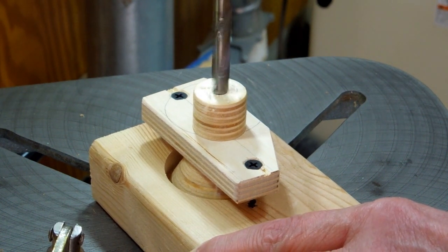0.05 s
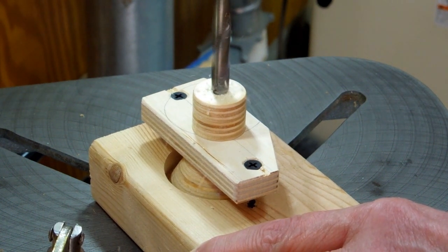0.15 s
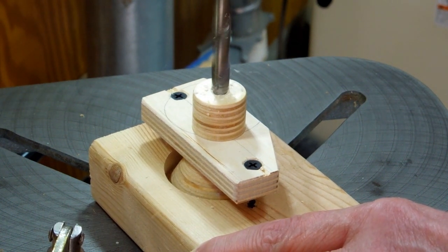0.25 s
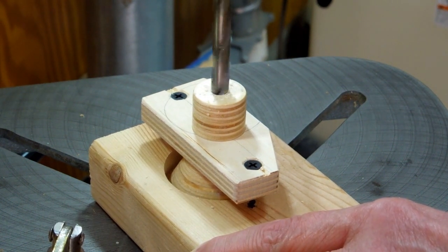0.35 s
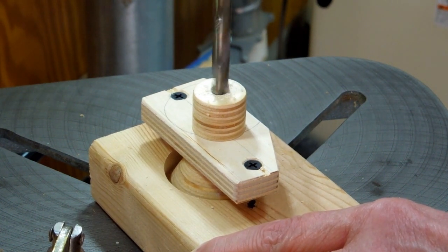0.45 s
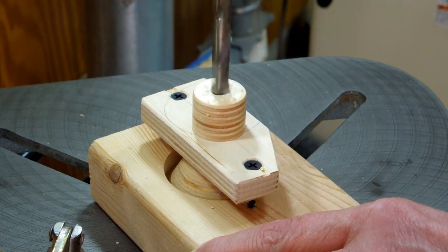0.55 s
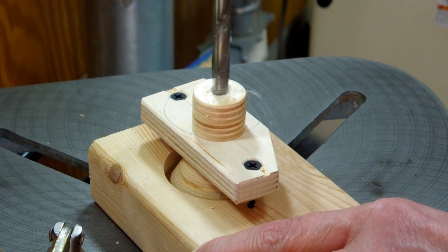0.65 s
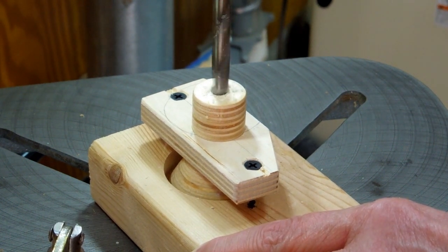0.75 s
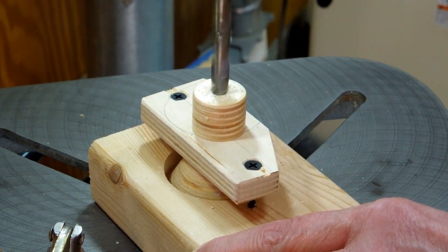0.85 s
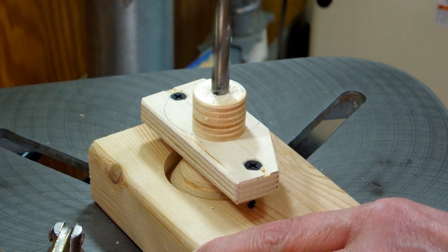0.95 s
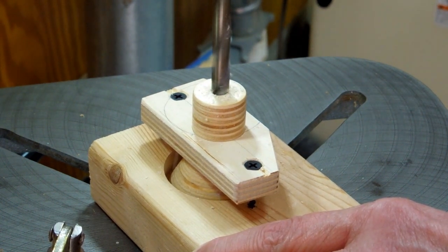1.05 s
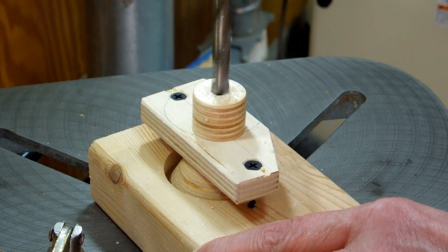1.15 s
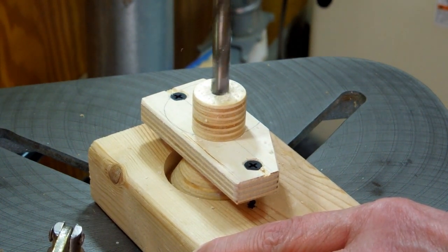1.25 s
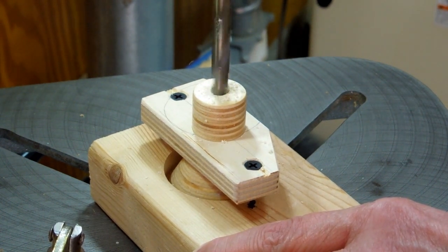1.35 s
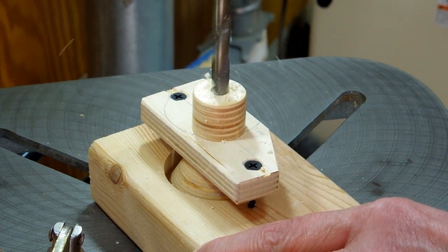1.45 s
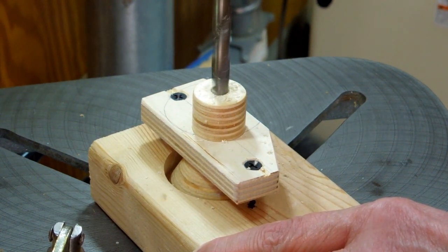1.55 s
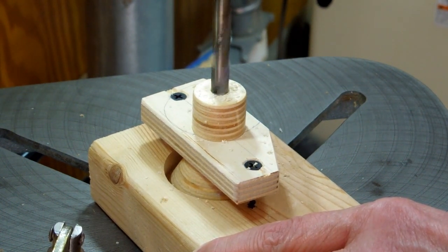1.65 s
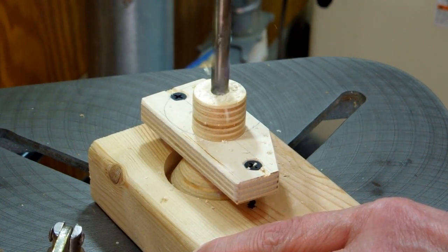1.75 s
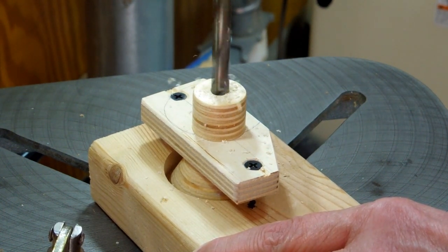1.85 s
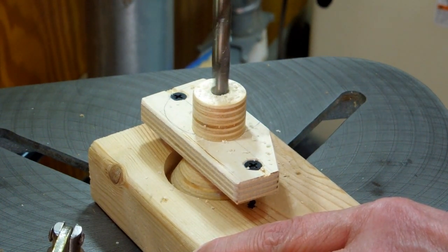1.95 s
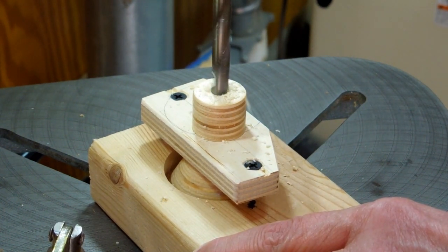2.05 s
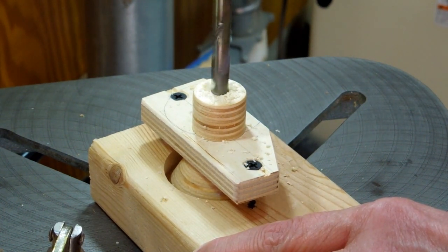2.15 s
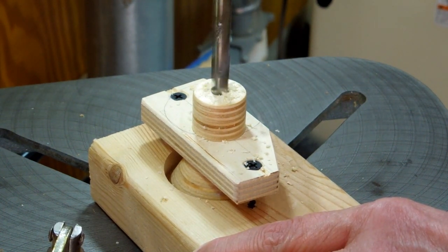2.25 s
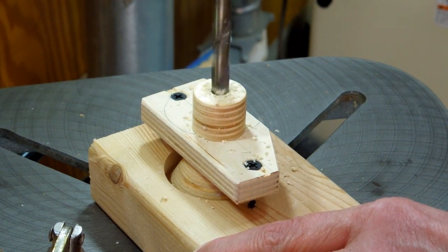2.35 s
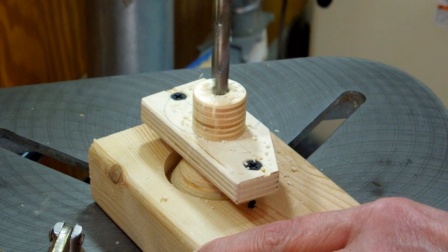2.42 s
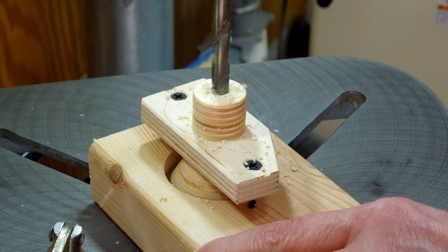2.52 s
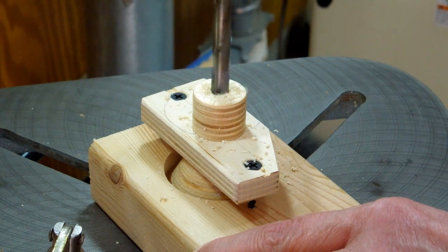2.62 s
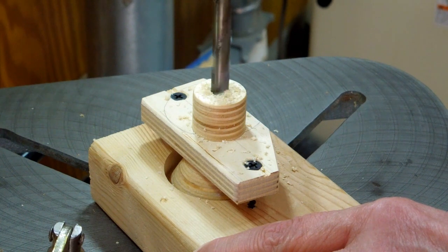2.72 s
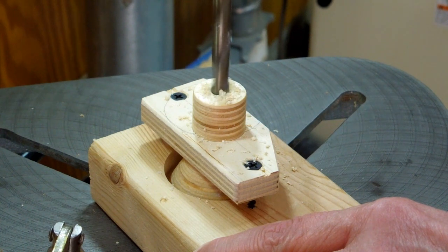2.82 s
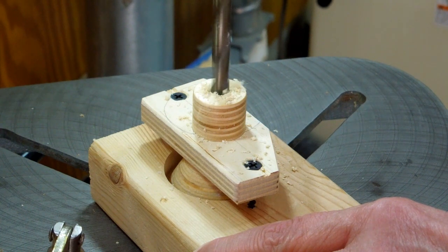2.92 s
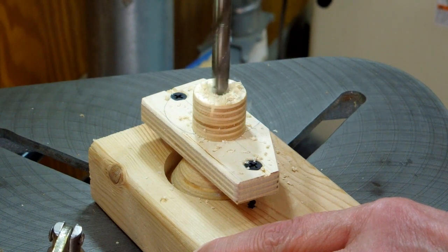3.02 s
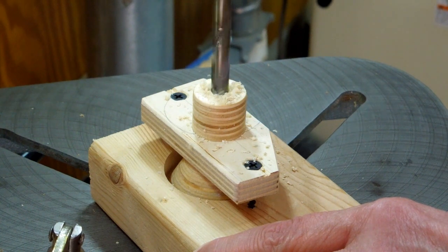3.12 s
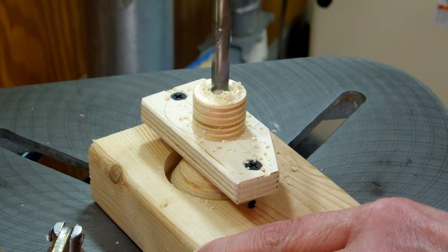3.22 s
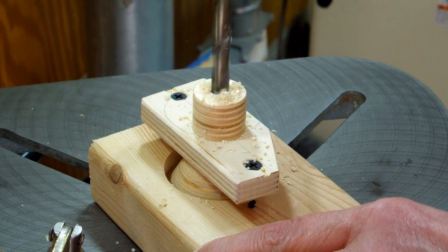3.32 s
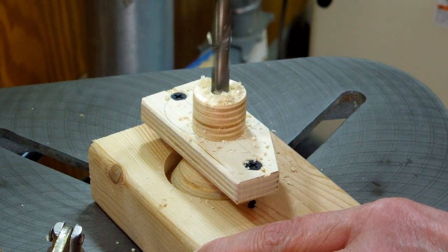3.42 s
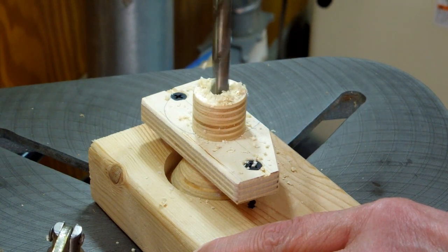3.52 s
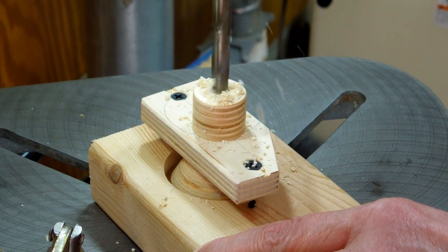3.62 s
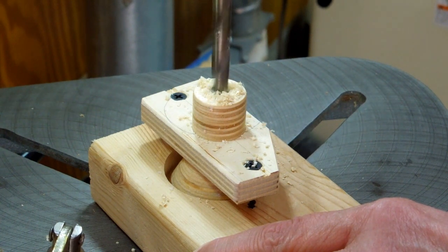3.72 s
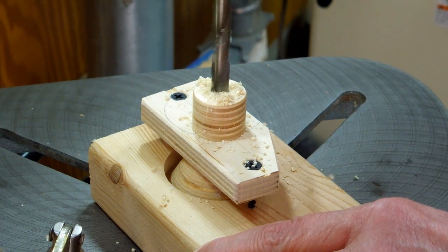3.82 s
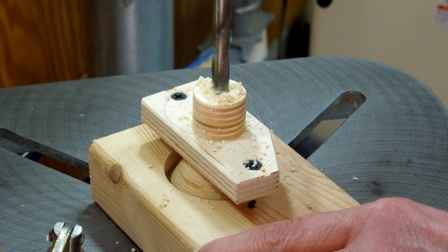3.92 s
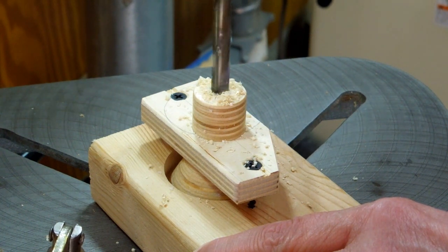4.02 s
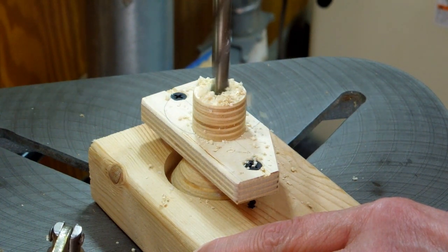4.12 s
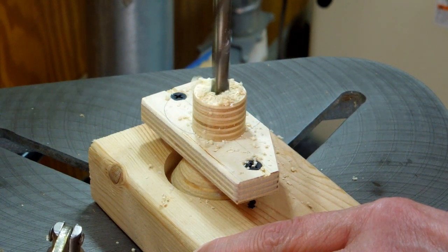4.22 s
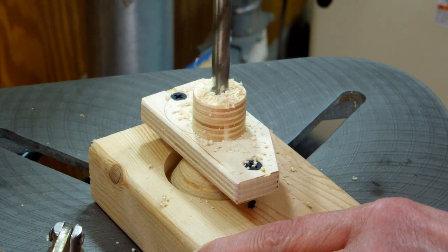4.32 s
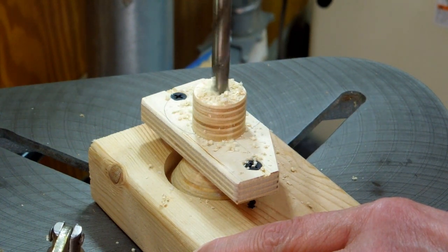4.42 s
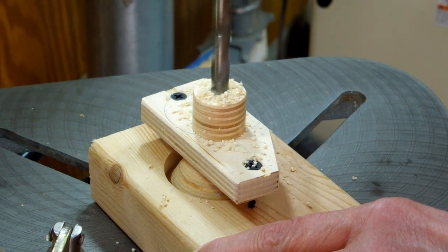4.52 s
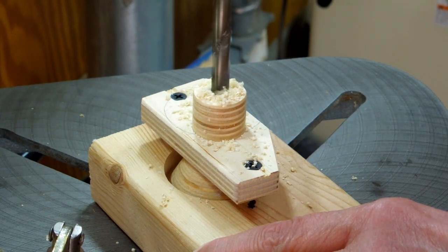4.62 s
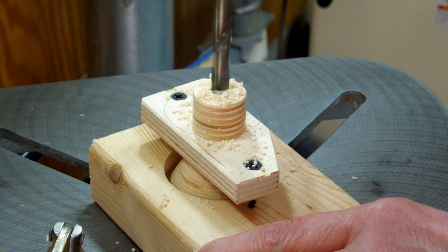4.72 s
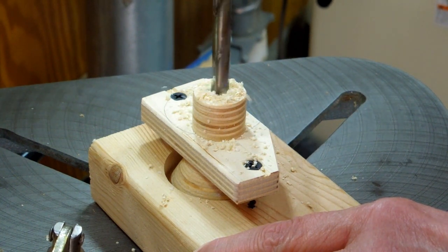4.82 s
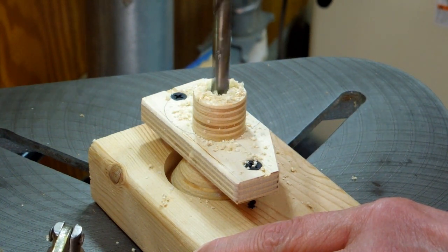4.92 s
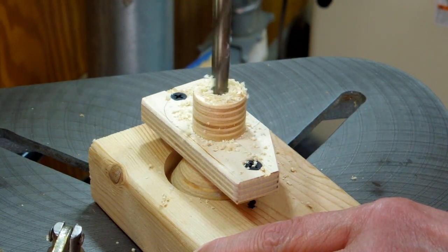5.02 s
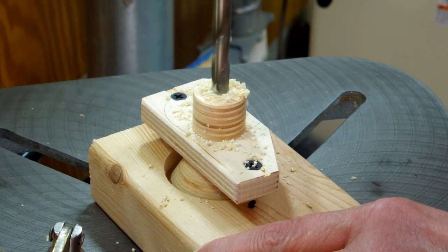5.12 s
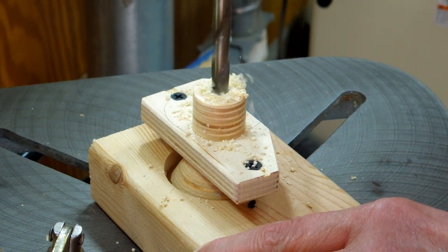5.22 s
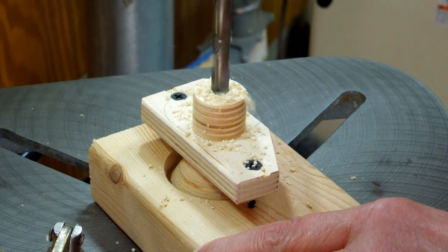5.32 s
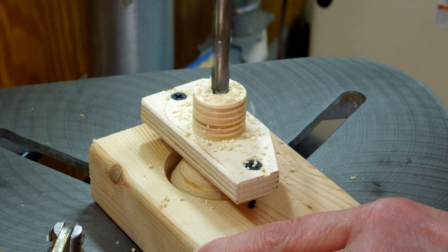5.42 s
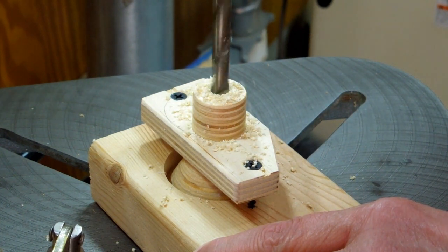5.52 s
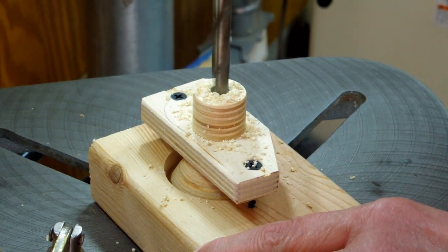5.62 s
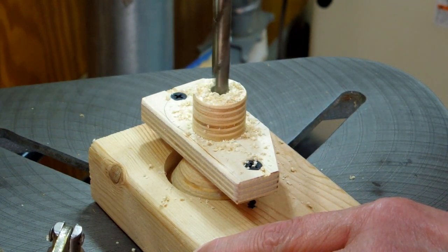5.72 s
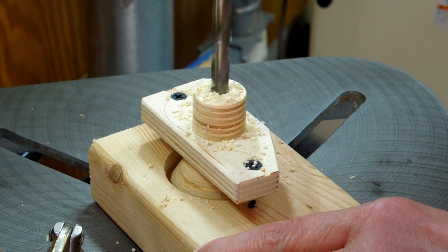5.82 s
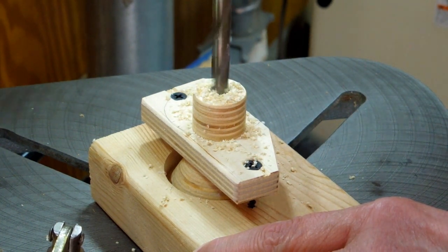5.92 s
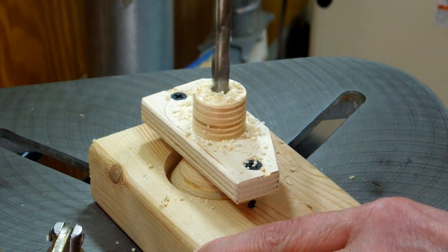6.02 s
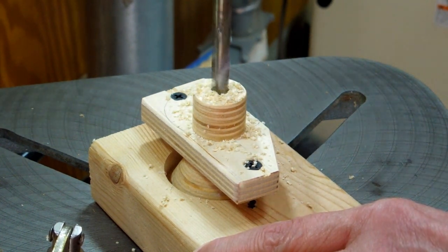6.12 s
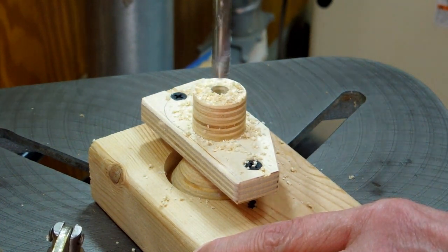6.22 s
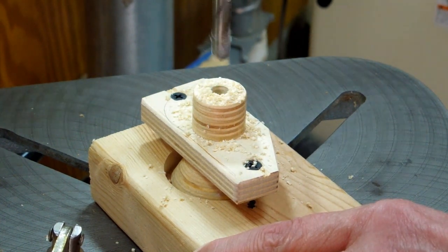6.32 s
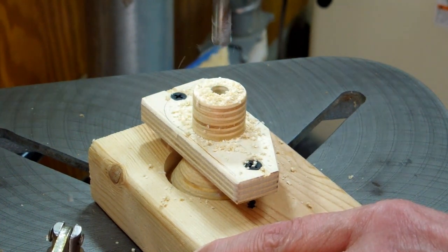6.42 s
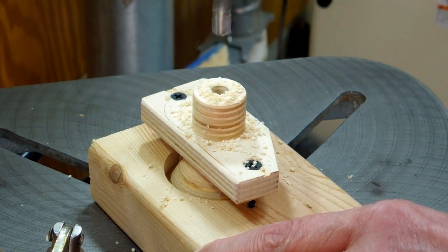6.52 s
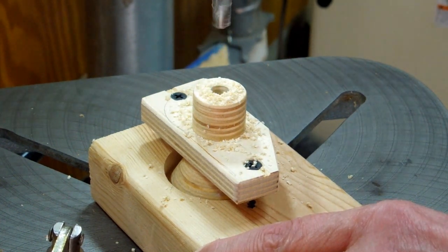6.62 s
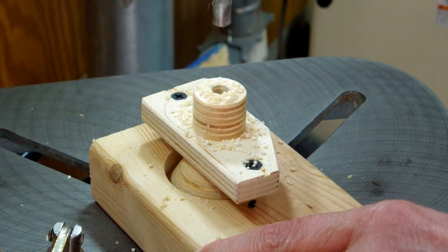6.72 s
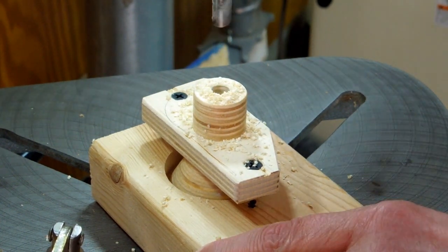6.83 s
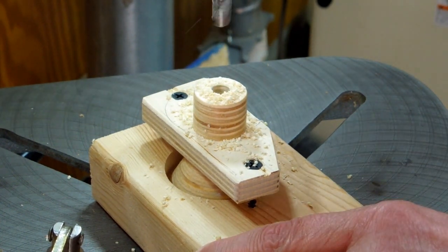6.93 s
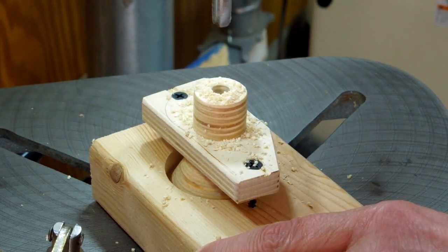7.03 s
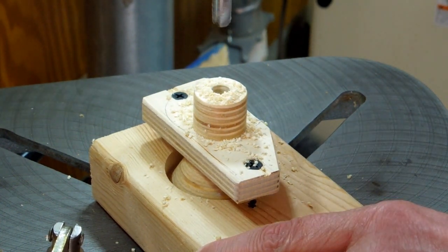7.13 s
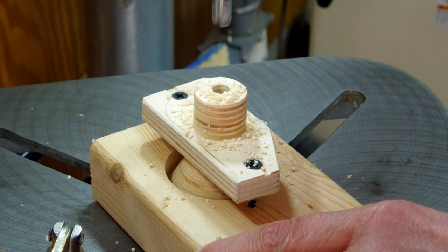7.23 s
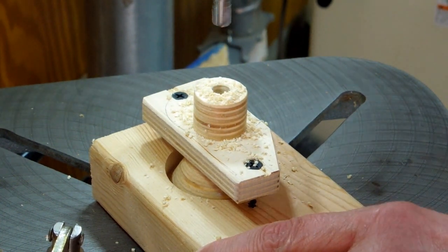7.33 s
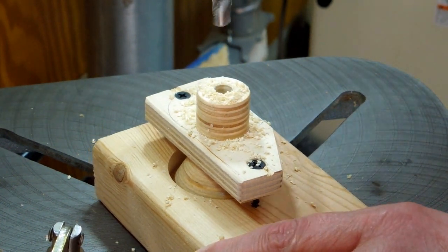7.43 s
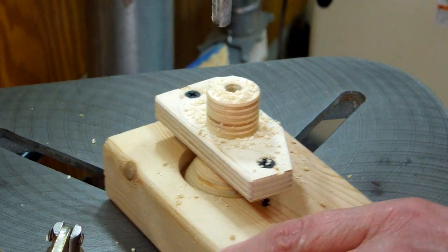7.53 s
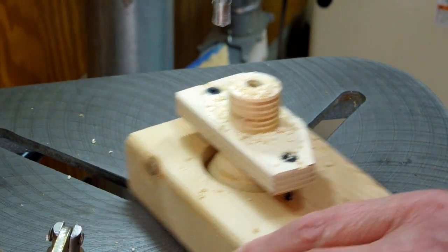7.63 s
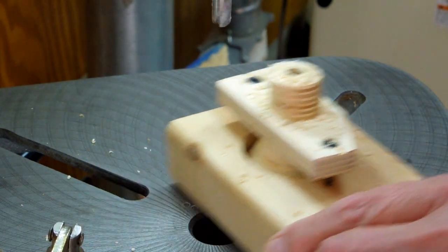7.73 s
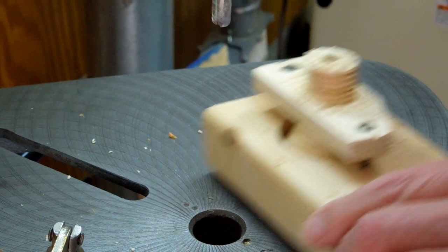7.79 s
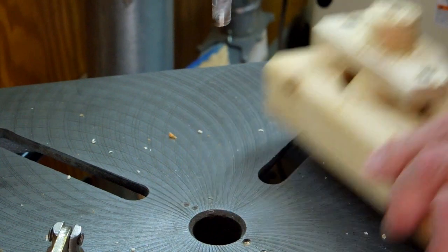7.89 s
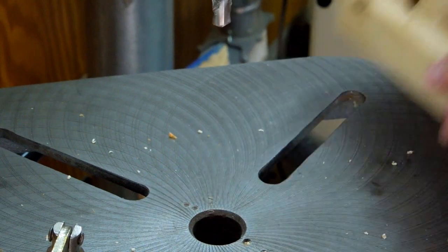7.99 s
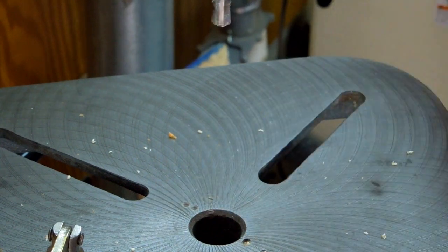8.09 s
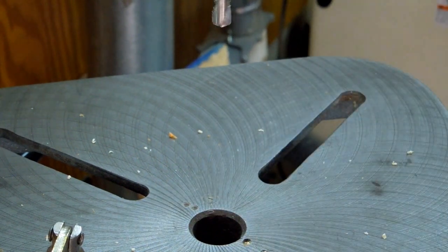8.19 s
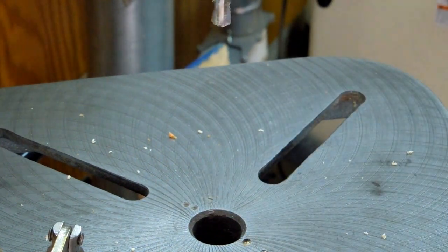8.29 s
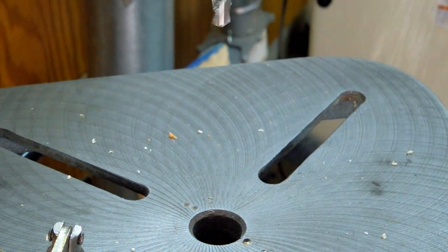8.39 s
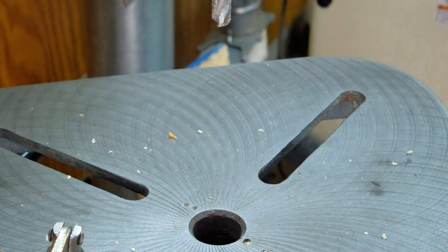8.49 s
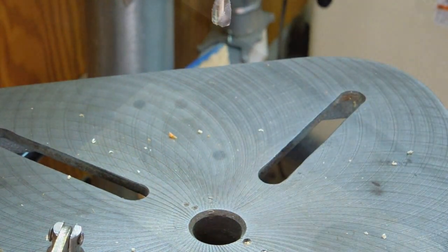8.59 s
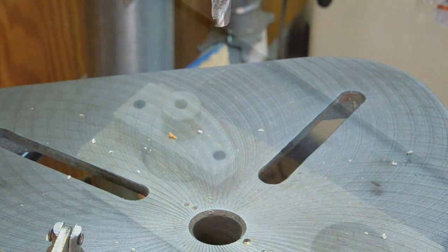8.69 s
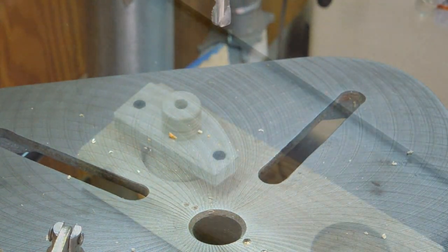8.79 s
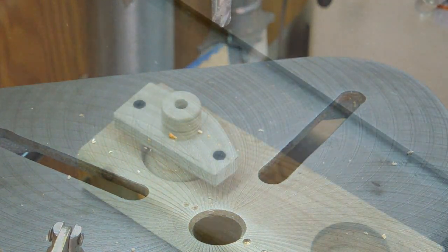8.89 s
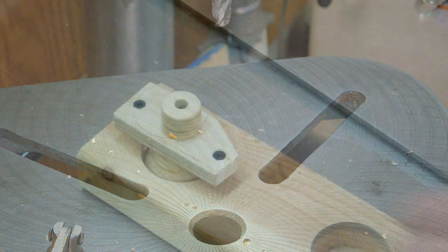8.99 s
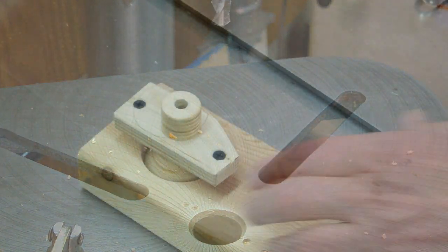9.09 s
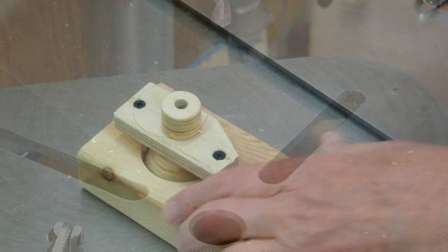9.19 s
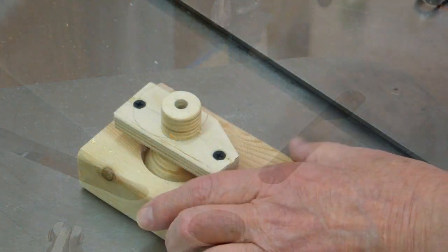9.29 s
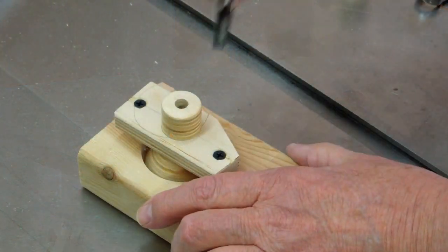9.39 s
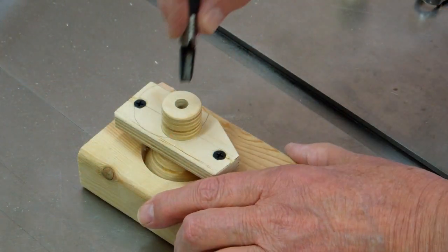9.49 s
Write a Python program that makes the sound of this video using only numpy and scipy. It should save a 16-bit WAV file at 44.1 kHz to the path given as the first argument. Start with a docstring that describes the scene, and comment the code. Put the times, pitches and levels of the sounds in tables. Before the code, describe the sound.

A drill bit rasps and throbs through wood on a humming drill press, lifts out, then a loud switch click and a whirring spin-down.

```python
"""In a workshop, a drill press bores into a wooden jig on its iron table, close to a two-port microphone.
Chips torn by the bit's two edges are throbbing noise that rings resonances of bit and jig; bearings and belt are
coloured noise, the motor two wavering sines. The switch clicks off, the spindle coasts, a starting switch clacks;
a faint soft rustle of the next scene comes in as the workshop fades out. Until 7.2 s each channel is spliced from
short pieces shifted in time."""
import sys
import numpy as np
from scipy import signal
from scipy.fft import rfft, irfft, next_fast_len
from scipy.io import wavfile
from scipy.ndimage import uniform_filter1d

SR = 44100
rng = np.random.default_rng(int(sys.argv[2]) if len(sys.argv) > 2 else 0)


def generate_wav(signal):
    """Clip the signal to [-1, 1] and save it as 16-bit WAV at the path in sys.argv[1]."""
    frames = np.transpose(np.atleast_2d(signal))
    scaled = np.clip(frames, -1, 1) * 32767
    pcm = np.round(scaled).astype(np.int16)
    wavfile.write(sys.argv[1], SR, pcm)


N = 421155
T = np.arange(N) / SR
SIZE = next_fast_len(N + SR // 8)
HZ = np.fft.rfftfreq(SIZE, 1 / SR)

# Motor and table levels. Each row: time in seconds, hum, its octave and table thrum in dB.
HUM = [(0, -36, -37, -28.5), (.8, -31.5, -33.5, -30), (1.5, -32, -32, -33.5), (3.2, -32.5, -30, -32),
       (3.9, -33, -35.5, -35.5), (4.75, -32.5, -28.5, -34.5), (5.8, -34, -36.5, -33),
       (6.25, -31, -28, -37.5), (6.45, -31, -36, -38), (7.22, -29, -39, -29.5), (7.32, -50, -43, -36.5),
       (7.5, -60, -66, -44.5), (8.0, -46, -58, -50), (8.7, -62, -58, -45.5), (9.0, -74, -76, -58),
       (9.3, -67, -78, -71)]
# Resonances of the wooden jig, high and low. Each row: frequency in Hz, width in Hz, relative level in dB.
JIG = [(1066, 110, -4), (1275, 370, -10.5), (942, 52, -10), (1170, 113, -16.5)]
JIG_LOW = [(306.5, 82, -1.5), (433, 77, -6), (643, 24, -8.5), (740, 70, -5.5), (827, 97, -2)]
# Switch events. Each: start in seconds, energy of the first 16 ms in dB, burst length in seconds.
OFF_SWITCH = (7.2638, 21.5, .005)
STARTER = (8.526, 15.5, .0047)
# Stretches where both channels are cut alike (lag 0) or far apart.
# Each row: start in seconds, end in seconds, lag in ms either way (before scatter).
SLIPS = [(0, .06, 0), (.22, .46, 4), (.64, .72, 0), (.83, .94, 0), (1.16, 1.25, 0), (1.5, 1.7, 3.2),
         (1.78, 2.03, 3.2), (2.18, 2.21, 0), (2.41, 2.45, 0), (2.8, 2.88, 3.5), (3.0, 3.18, 3),
         (3.38, 3.47, 0), (3.86, 4.25, 3.8), (4.35, 4.41, 0), (4.59, 4.66, 0), (4.72, 4.86, 3.2),
         (5.04, 5.1, 0), (5.29, 5.35, 0), (5.46, 5.6, 3.8), (5.72, 6.25, 3.9), (7.12, 7.215, 3)]
JOIN_S, SPLICED_UNTIL_S = .014, 7.215  # longest cross-fade; end of the shifted pieces


def amp(db):
    """Level law: 20 dB is a factor of ten in amplitude."""
    return 10 ** (np.asarray(db) / 20)


def evened(x):
    """Normalisation to unit root-mean-square amplitude."""
    return x / np.sqrt(np.mean(x ** 2) + 1e-20)


def curves(rows):
    """Linear interpolation in time of every column of a table."""
    s, *columns = np.transpose(rows)
    return [np.interp(T, s, c) for c in columns]


def read(points, hz=HZ):
    """Interpolation of a spectrum table along a logarithmic frequency axis."""
    f, value = np.transpose(points)
    return np.interp(np.log(hz + 1), np.log(f + 1), value)


def rings(modes):
    """Modal superposition: the summed response of damped resonances (Hz, width Hz, dB)."""
    return sum(amp(db) / (1 + 2j * (HZ - f) / width) for f, width, db in modes)


def shape(x, response):
    """Linear filtering: a product of spectra."""
    return irfft(rfft(x, SIZE) * response, SIZE)[..., :N]


def highs(hz):
    """High-pass response with a steep roll-off below hz."""
    return 1 / (1 + (hz / (HZ + 1)) ** 4)


def wander(hz):
    """Low-passed chance of unit rms, moving mostly slower than hz."""
    steps = np.arange(0, N + 200, 100)
    decay = np.exp(-2 * np.pi * hz * 100 / SR)
    slow = signal.lfilter([1], [1, -decay], rng.standard_normal(len(steps)))
    return evened(np.interp(np.arange(N), steps, uniform_filter1d(slow, size=5)))


def grit(per_s, spread_db):
    """Shot noise: randomly timed clicks of uneven size, shared by two noise draws."""
    size = amp(spread_db * np.minimum(rng.exponential(1, N), 5))
    clicks = size * (rng.random(N) < per_s / SR)
    return evened(uniform_filter1d(clicks, size=12) * rng.standard_normal((2, N)))


def lumpy(tear, modes, strikes, lump_db):
    """Uneven modal excitation: each strike drives each mode (Hz, width Hz, dB) with its own strength."""
    luck = rng.standard_normal((int(strikes[-1]) + 2, len(modes)))
    total = 0
    for k, (hz, width, db) in enumerate(modes):
        strength_db = lump_db * np.interp(strikes, np.arange(len(luck)), luck[:, k])
        drive = tear * amp(strength_db - .115 * lump_db ** 2 + db)  # offset for the mean power of the spread
        # squaring narrows a resonance, so it starts wider
        total = total + shape(drive, rings([(hz, 1.66 * width, 0)]) ** 2)
    return total


def cutting():
    """Periodic fracture: each edge pass tears a burst of fibres, and bit and jig resonate with it."""
    # Tearing of chips under feed pressure. Each row: time in seconds, level in dB.
    cut = [(0, -22.5), (.2, -24), (.32, -21.5), (.6, -26), (.85, -22), (.95, -25), (1.1, -28.5),
           (1.25, -22.5), (1.6, -19), (1.78, -23.5), (2.1, -22), (2.42, -22), (2.56, -22.5), (2.95, -22.5),
           (3.38, -23), (3.72, -26.5), (3.85, -24.5), (3.97, -26), (4.2, -23.5), (4.4, -23.5),
           (4.58, -20.5), (4.78, -23), (5.24, -27.5), (5.4, -31), (5.58, -28.5), (5.65, -35), (5.72, -42)]
    # Slip of the throb against a steady beat. Each row: time in seconds, share of a pass.
    slide = [(0, .22), (.45, .2), (.9, .15), (1.2, -.03), (1.5, -.11), (1.8, -.28), (2.1, -.16), (2.4, .12),
             (2.7, -.02), (2.85, -.25), (3.33, -.26), (3.45, .2), (3.78, .28), (3.88, -.2), (4.37, -.27),
             (4.5, .2), (5.1, .2), (5.25, -.14)]
    # The jig's ring is strongest over the chips from 2.4 to 3.5 s, its low modes over the high ones before 1 s.
    # Each row: time in seconds, jig over chips in dB, low modes over high ones in dB.
    boom = [(0, -5.5, 0), (.35, -4, 0.5), (.9, -4, 1.5), (1.5, -5, -1.5), (2.4, -2.5, -6),
            (3.4, -2.5, -11.5), (3.5, -3, -8), (4, -6.5, -3.5), (4.8, -8, -2), (5.7, -4.5, -5)]
    # Chip noise colour. Each row: frequency in Hz, relative level in dB per Hz.
    chip_colour = [(880, -57), (1500, -10), (1760, 5), (2180, 8), (2650, 6), (2970, 12), (4190, 10),
                   (6510, -1), (12100, -1), (14000, -6)]
    # Passes that stand out, most of them harder bites; negative values weaken the drive.
    # Each row: time in seconds, change in the drive of the jig in dB, of the bit in dB.
    accents = [(0.115, 3, 11.5), (0.154, 7.5, 5), (0.318, 8.5, 10.5), (0.36, 0, 4), (0.403, 0, -2),
               (0.791, 6.5, 3), (0.845, 3, 3.5), (0.873, 5, 2), (1.224, 5.5, 0), (1.326, 1.5, 7),
               (1.879, -6, 3), (1.918, 2, 3), (2.0, -1, 3), (2.044, 0, 3), (2.313, -1, 2.5), (2.399, 4, 9),
               (2.471, -0.5, 5), (2.898, 3, 5.5), (2.976, -1, 1.5), (3.06, -6, 6), (3.143, 0, 4.5),
               (3.222, 4, 6), (3.296, 7.5, -3), (3.348, 1, -1), (3.375, 2, -1.5), (3.4, 1.5, 8),
               (3.815, 7, 4.0), (3.87, 5, 1.5), (4.035, -0.5, 4), (4.078, 1.5, 7.5), (4.115, 0.0, 7),
               (4.199, 2, 7), (4.237, 2, 8), (4.277, 0, 3.5), (4.448, 2, 3), (4.48, 6, 3), (4.515, 6, 3),
               (4.543, -3, 1), (4.628, 1, 4.5), (4.707, 0, 0), (4.828, 1, 4), (4.866, 1, 3.5),
               (5.209, 4, 7.5), (5.244, 1, 5), (5.586, 9, 0)]
    # Modes of the bit. Each row: frequency in Hz, width in Hz, relative level in dB in a shallow hole, in a deep one.
    bit_modes = [(1710, 116, -7, -22.5), (2170, 100, -3, -9), (2500, 300, 2, -31), (2866, 54, 5.5, -6.5),
                 (3096, 65, 1.5, 0.5), (3317, 68, -36, 3), (3677, 150, -16, -4), (3932, 76, -10, 2.5),
                 (4185, 330, -5, -3), (4520, 72, -13, -6)]
    # Low bit modes rasp for a moment: centre and spread (sigma) in seconds, boost in dB, upper limit in Hz.
    rasp_s, rasp_spread_s, rasp_boost_db, rasp_below_hz = (4.62, 0.13, 10, 2300)
    passes_per_s, edge_depth_db, accent_spread_s = 24.6, 1.5, 0.006  # accent spread is a sigma
    loading_s, flute_depth_db = (.9, 1.8), (1.5, 4.2)  # throb depth where the flutes ring, free to loaded
    flute_hz = (2500, 5000)
    deepening_s = (0.78, 2.2)  # the bit sinks from shallow to deep

    chip_db = curves(cut)[0]
    jig_db, boom_db = curves(boom)
    passes = passes_per_s * T + curves(slide)[0]
    pass_db = 0.37 * rng.standard_normal(int(passes[-1]) + 2)  # some passes bite harder
    edge = np.cos(2 * np.pi * passes) + 0.4 * np.cos(4 * np.pi * passes)  # short bites, long gaps
    throb_db = edge_depth_db * edge + np.interp(passes, np.arange(len(pass_db)), pass_db)
    lifted = np.clip((cut[-1][0] - T) / 0.018, 0, 1)  # the bit leaves the hole
    noise = 1.17 * rng.standard_normal((2, N)) + grit(per_s=3500, spread_db=3.5)
    tear = evened(noise * amp(throb_db)) * lifted

    jig_accent_db, bit_accent_db = sum(np.outer(db, np.exp(-((T - s) / accent_spread_s) ** 2 / 2))
                                       for s, *db in accents)
    deeper_throb_db = (np.interp(T, loading_s, flute_depth_db) - edge_depth_db) * edge
    scrape = tear * amp(deeper_throb_db + bit_accent_db)
    colour, flutes = amp(read(chip_colour)), highs(flute_hz[0]) * (1 - highs(flute_hz[1]))
    chips = shape(tear * amp(0.53 * bit_accent_db), colour * (1 - flutes))
    chips = evened(chips + amp(-19) * shape(scrape, colour * flutes))

    rasp_db = rasp_boost_db * np.exp(-((T - rasp_s) / rasp_spread_s) ** 2 / 2)
    moving_modes = [(hz, width, np.interp(T, deepening_s, db) + rasp_db * (hz < rasp_below_hz))
                    for hz, width, *db in bit_modes]
    bit = evened(lumpy(scrape, moving_modes, 2 * passes, lump_db=3.8))  # two strikes a pass
    high, low = (evened(shape(lumpy(tear * amp(jig_accent_db), modes, 2 * passes, lump_db=3.2), highs(114)))
                 for modes in (JIG, JIG_LOW))
    jig = (high + low * amp(boom_db)) * amp(jig_db)
    return (chips + bit * amp(-9.5) + jig) * amp(chip_db)


def snaps():
    """Impulsive fracture: chips snap in short noise bursts, bright off the steel, hollow through the jig."""
    # Each row: start in seconds, crack and jig drive in dB before filtering.
    snap_rows = [(0.0288, -6, -7), (0.1134, -14, -14), (0.269, -8, -46), (0.316, -22, 2),
                 (0.8394, -8.5, -15), (0.8694, -8, -15), (2.384, -10, -15), (3.7245, -10, -39),
                 (4.0757, -7, -36), (4.229, -14, -34), (4.615, -8, -39), (5.064, -15, -19),
                 (5.24, -7.5, -33), (5.5854, -3.5, -35), (5.9288, -4.5, -42)]
    crack, knock = np.zeros((2, 2, N))
    t = np.arange(900) / SR
    for s, crack_db, jig_db in snap_rows:
        burst = rng.standard_normal((2, len(t))) * np.minimum(t / 0.0022, 1) * np.exp(-t / 0.006)
        crack[:, round(s * SR):][:, :len(t)] += amp(crack_db) * burst
        knock[:, round(s * SR):][:, :len(t)] += amp(jig_db) * burst
    bright = shape(crack, 1 / (1 + (4000 / (HZ + 1)) ** 2))
    return bright + shape(knock, rings(JIG + JIG_LOW) * highs(420))


def spindle():
    """Broadband friction noise of belt and bearings, coloured by the housing's resonances."""
    # Each row: time in seconds, body in dB, hiss in dB.
    whir_levels = [(5.65, -27.5, -26), (6.28, -27, -25.5), (6.53, -23, -22), (6.95, -24.5, -22.5),
                   (7.13, -21, -19.5), (7.43, -29.5, -28), (7.65, -33.5, -30), (7.82, -33, -29.5),
                   (8.02, -31.5, -35.5), (8.25, -34.5, -36), (8.48, -40, -47), (8.78, -45, -52),
                   (8.9, -50, -48), (9.28, -63, -56), (9.55, -64, -66)]
    # Each row: frequency in Hz, relative level in dB per Hz.
    whir_colour = [(60, -62), (150, -13), (250, -9), (520, -13), (770, -10), (1100, -14.5), (2770, -13.5),
                   (3770, -15.5), (6000, -10), (9520, -13), (14000, -20)]
    # Head casting and spindle. Each row: frequency in Hz, width in Hz, relative level in dB.
    housing = [(293, 20, 10), (1720, 420, -7), (3200, 52, 14), (3387, 20, 16), (4660, 420, 2),
               (5230, 130, 4.5), (7250, 430, 6.5), (7900, 104, 9.5), (9420, 33, 19.5), (11900, 250, 5)]
    # The starting switch drags on the slowing rotor. Each row: time in seconds, level in dB.
    drag_levels = [(8.6, -39), (8.918, -46.5), (8.962, -56), (8.97, -50), (9.0, -47.5), (9.2, -61)]
    # Each row: frequency in Hz, width in Hz, relative level in dB.
    drag_rings = [(800, 170, -5), (1280, 380, 0.5), (4100, 350, -5), (4900, 410, -19), (6000, 490, -24),
                  (7560, 90, 0), (7900, 60, 1), (8900, 90, -14), (9300, 200, -11), (12100, 300, -1)]
    # A hollow band swells as the spindle coasts. Each row: time in seconds, level in dB.
    coast_levels = [(7.35, -59), (7.544, -51), (7.728, -45), (8.256, -39), (8.402, -39.5), (8.526, -40),
                    (8.7, -52)]
    # Each row: frequency in Hz, width in Hz, relative level in dB.
    coast_rings = [(1750, 180, -4), (2070, 30, 2.5), (3000, 560, -11), (4600, 400, -20), (5400, 500, -15),
                   (6300, 860, -12)]
    # Airy whistle of the coasting spindle. Each row: time in seconds, level in dB.
    swell_levels = [(7.3, -50), (7.6, -44), (7.8, -35.5), (7.95, -44), (8.1, -45), (8.3, -44), (8.6, -52)]
    # Each row: frequency in Hz, width in Hz, relative level in dB.
    swell_rings = [(3060, 70, 0), (3240, 54, -4), (3330, 63, -7), (3440, 60, -7), (4840, 27, 5),
                   (1310, 49, -9)]

    body_db, hiss_db = curves(whir_levels)
    drive = rng.standard_normal((2, N)) + 0.072 * grit(per_s=1900, spread_db=5.0)
    drive = drive * amp(1.29 * wander(2.6))
    response = amp(read(whir_colour)) * (2.1 + rings(housing))
    body = shape(drive, response * (1 - highs(5950)))
    hiss = shape(drive, response * highs(12900))
    running = T < whir_levels[0][0] + 1  # levels refer to the steady run
    whir = body / body[:, running].std() * amp(body_db) + hiss / hiss[:, running].std() * amp(hiss_db)

    hollow = evened(shape(drive, rings(coast_rings))) * amp(curves(coast_levels)[0])
    whistle = evened(shape(drive, rings(swell_rings))) * amp(curves(swell_levels)[0])
    fade = np.clip((coast_levels[-1][0] - T) / 0.11 + 1, 0, 1)
    coast = (hollow + whistle) * (T > OFF_SWITCH[0]) * fade
    drag = evened(shape(rng.standard_normal((2, N)), rings(drag_rings))) * amp(curves(drag_levels)[0])
    return whir + coast + drag * (T > STARTER[0])


def motor():
    """Magnetic forces in the windings hum at twice the mains and its octave; the iron table resonates."""
    # Table resonances. Each row: frequency in Hz, width in Hz, relative level in dB, both before squaring.
    thrum_rings = [(259, 10, -3), (266, 82, 3), (141, 35, 5.5), (369.3, 32, 1)]
    hum_db, octave_db, thrum_db = curves(HUM)
    turns = 2 * np.pi * np.cumsum(119.45 + 2.21 * wander(9.3)) / SR  # mean hum and its wander in Hz
    hum = np.sin(turns) * amp(hum_db + 2.2 * wander(4.7))
    hum += np.sin(2 * turns + 1) * amp(octave_db + 1.5 * wander(4.5))
    shake = rng.standard_normal((2, N)) * amp(0.5 * wander(25))
    return hum, evened(shape(shake, rings(thrum_rings) ** 2)) * amp(thrum_db)


def switch(event, modes, tick, tick_hz, wet_db):
    """Impact excitation: noisy chatter and a sharp blow ring the modes, then reverberation answers."""
    # Reverberation of the shop. Each row: frequency in Hz, 60 dB decay time in seconds.
    decay_times = [(250, 0.37), (1000, 0.31), (4000, 0.27), (12000, 0.31)]
    s, energy_db, length = event
    u = np.arange(2000) / SR / length
    chatter, start = np.zeros((2, N)), round(s * SR)
    burst, fall = rng.standard_normal((2, len(u))), u * np.exp(1 - u ** 1.5)
    for _ in range(4):  # a dense snap: no moment or band much stronger than the next
        flat = burst / np.sqrt(uniform_filter1d(burst ** 2, size=40) + 1e-12)
        z = rfft(flat * fall)
        burst = irfft(z / np.sqrt(uniform_filter1d(abs(z) ** 2, size=3) + 1e-12), len(u))
    chatter[:, start:start + len(u)] = burst * np.linalg.norm(fall) / np.linalg.norm(burst[0])
    hit = .25 * chatter
    hit[:, start + round(length * SR)] += 14  # the sharp blow, one burst length after the start

    hz, t, z = signal.stft(rng.standard_normal((2, SR // 2)), SR, nperseg=256)
    tail = signal.istft(z * amp(-60 * t / read(decay_times, hz)[:, None]), SR, nperseg=256)[1]
    shop = 1 + amp(wet_db) * rfft(tail / np.linalg.norm(tail[0]), SIZE)
    narrow = [m for m in modes if m[1] < 200]
    wide = [m for m in modes if m[1] >= 200]
    dry_blow = shape(chatter, tick * highs(tick_hz) + rings(wide)) + shape(hit, rings(narrow))
    blow = shape(dry_blow, highs(240) * shop)
    return amp(energy_db) * blow / np.linalg.norm(blow[:, start:start + 700], axis=1)[:, None]


def off_switch():
    """Contact impact: the switch clicks off and its case resonates."""
    # Each row: frequency in Hz, width in Hz, relative level in dB.
    case = [(880, 70, 9), (1225, 90, 19), (1560, 150, 5), (2100, 110, 13), (2420, 150, 8), (3200, 600, 0),
            (4650, 400, 1), (5600, 790, 2), (9900, 550, -2), (11600, 440, -7)]
    return switch(OFF_SWITCH, case, tick=0.7, tick_hz=1500, wet_db=-10.0)


def shudder():
    """Release of load: the head casting resonates as the drive lets go."""
    # Start in seconds, energy of the first 16 ms in dB, burst length in seconds.
    event = (7.292, -9, .02)
    # Each row: frequency in Hz, width in Hz, relative level in dB.
    casting = [(365, 30, 0), (283, 30, -3), (1225, 70, -3)]
    return switch(event, casting, tick=0, tick_hz=1000, wet_db=-1)


def starting_switch():
    """Contact impact: the motor's starting switch clacks and its case resonates."""
    # Each row: frequency in Hz, width in Hz, relative level in dB.
    case = [(1190, 60, 6), (1490, 80, 16), (2175, 40, 2), (2720, 30, 3), (3800, 600, -9), (4940, 250, 5),
            (5900, 400, 2), (7360, 500, 0), (12000, 600, -4)]
    return switch(STARTER, case, tick=1.0, tick_hz=1870, wet_db=-3.0)


def thud():
    """Structure-borne response: the housing answers the starting switch, low and late."""
    # Start in seconds, energy of the first 16 ms in dB, burst length in seconds.
    event = (8.532, -6, .014)
    # Each row: frequency in Hz, width in Hz, relative level in dB.
    housing = [(390, 16, 0), (300, 50, -9)]
    return switch(event, housing, tick=0, tick_hz=1000, wet_db=-8)


def rustling():
    """Granular noise: a faint soft rustle of the next scene, as the workshop fades out."""
    # Each row: time in seconds, level in dB.
    rustle = [(9.08, -60), (9.165, -52), (9.19, -45), (9.23, -47), (9.27, -52), (9.33, -59.5), (9.47, -59),
              (9.51, -52), (9.55, -55)]
    # Each row: frequency in Hz, relative level in dB per Hz.
    rustle_colour = [(120, -58), (200, -24), (513, -10.5), (663, -18), (1070, -20), (1130, -9),
                     (1480, -19.5), (12000, -31), (15600, -67)]
    level = amp(curves(rustle)[0]) * np.clip((T - rustle[0][0]) / 0.54 + 1, 0, 1)
    grains = rng.standard_normal((2, N)) + .5 * grit(per_s=2800, spread_db=-4)
    return level * evened(shape(grains, amp(read(rustle_colour))))


def rumble():
    """Low-passed structure-borne noise: the floor shakes a little with the table's thrum."""
    low = evened(shape(rng.standard_normal((2, N)), 1 / (1 + (HZ / 70) ** 2)))
    return low * (amp(-49 + curves(HUM)[2]) + amp(-58.5))


def hush():
    """Uncorrelated background noise: room tone and microphone hiss, unlike at the two ports."""
    # Each row: frequency in Hz, relative level in dB per Hz.
    hush_colour = [(35, -30), (60, -14), (66, -12), (225, -15), (310, -22), (501, -28), (587, -25),
                   (14000, -27)]
    return amp(-54.5) * evened(shape(rng.standard_normal((2, N)), amp(read(hush_colour))))


def apart():
    """Gate with smoothed edges: 1 while the channels are cut at different places, 0 while alike."""
    alike = T >= SPLICED_UNTIL_S
    for first, last, lag_ms in SLIPS:
        alike = alike | (lag_ms == 0) & (T >= first) & (T < last + JOIN_S / 2)
    return uniform_filter1d(1. - alike, size=round(JOIN_S * SR / 2))


def scene():
    """Partial coherence: two draws of the sound are blended as two close microphone ports hear it."""
    # Each row: frequency in Hz, left-right likeness from 0 to 1.
    likeness = [(60, 0.81), (150, 1), (380, 0.97), (940, 0.99), (2360, 1), (5920, 0.79), (14800, 0.56)]
    # Each row: frequency in Hz, phase in radians by which the left leads.
    lead = [(1500, 0), (3000, .15), (6000, .4), (11000, 1.4), (14000, 2)]
    stray_rad = .7  # how far the right strays to other moments of the noise while cut apart
    hum, thrum = motor()
    near, other = (cutting() + snaps() + spindle() + thrum + off_switch() + shudder()
                   + starting_switch() + thud() + rustling() + rumble())
    same = np.clip(read(likeness), 0, 1)
    turn, rest = np.exp(-1j * read(lead)), np.sqrt(1 - same ** 2)
    right = shape(near, same * turn) + shape(other, rest)
    stray = shape(other, same) - shape(near, rest * turn)
    angle = stray_rad * apart()
    right = right * np.cos(angle) + stray * np.sin(angle)
    return np.array([near * amp(0.02), right]) + hum + hush()


def record(dry):
    """Time-shifted splicing of each channel by cross-fades, then overload clipping and a band limit."""
    piece_s, usual_lag_ms, scatter_share = .04, (.4, 2.0), .12  # scatter of a wide lag, relative
    turn_share = .3  # chance that the lag changes side at a piece
    first, last, size_ms = np.transpose(SLIPS)
    starts = np.unique(np.r_[np.arange(0, SPLICED_UNTIL_S - piece_s, piece_s), first, last])
    chance, scatter = rng.uniform(-1, 1, (len(starts), 2)).T
    way = np.cumprod(np.where(abs(chance) < turn_share, -1, 1))
    row = np.searchsorted(first, starts, "right") - 1
    wide_ms = size_ms[row] * way * (1 + scatter_share * scatter)
    usual_ms = way * np.interp(abs(scatter), (0, 1), usual_lag_ms)
    lag_ms = np.where(starts < last[row], wide_ms, usual_ms) * (starts < SPLICED_UNTIL_S)
    shift = np.round(lag_ms * SR / 1000).astype(int)

    piece = np.searchsorted(starts, T, "right") - 1
    before = np.maximum(piece - 1, 0)
    room_s = np.minimum(np.diff(starts, append=N / SR), JOIN_S)
    fade = np.pi / 2 * np.clip((T - starts[piece]) / room_s[piece], 0, 1)
    out = np.zeros_like(dry)
    for side, part in enumerate((shift // 2, shift // 2 - shift)):  # half the lag each way
        alike = part[piece] == part[before]
        for k, gain in ((piece, np.sin(fade)), (before, np.cos(fade))):
            gain = np.where(alike, gain ** 2, gain)  # an unmoved join must not swell
            out[side] += gain * dry[side, np.clip(np.arange(N) + part[k], 0, N - 1)]
    out = np.clip(out, -.98, .98)
    band_limit = signal.firwin(511, 14150, window=("kaiser", 9), fs=SR)  # low-pass edge in Hz
    return signal.oaconvolve(out, band_limit[None], "same")


dry = scene()
out = record(dry)
generate_wav(out)
```